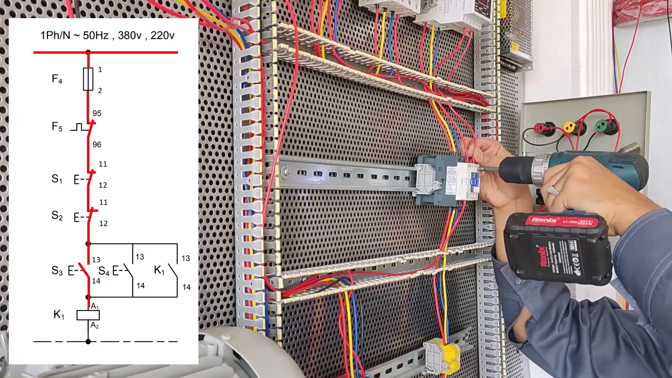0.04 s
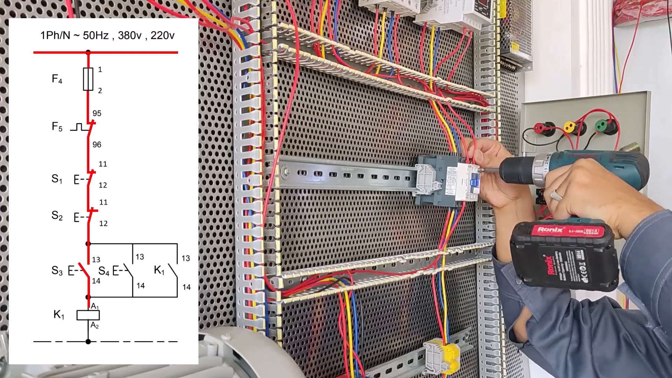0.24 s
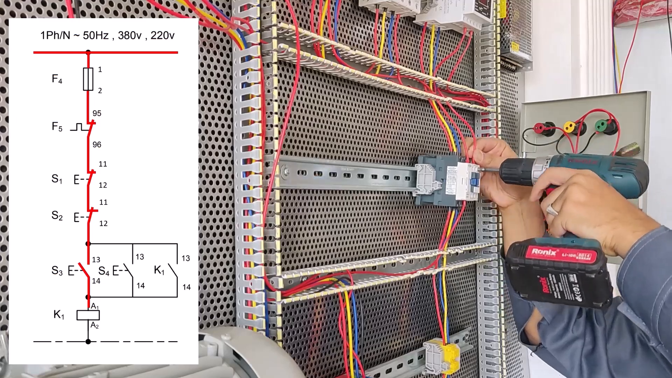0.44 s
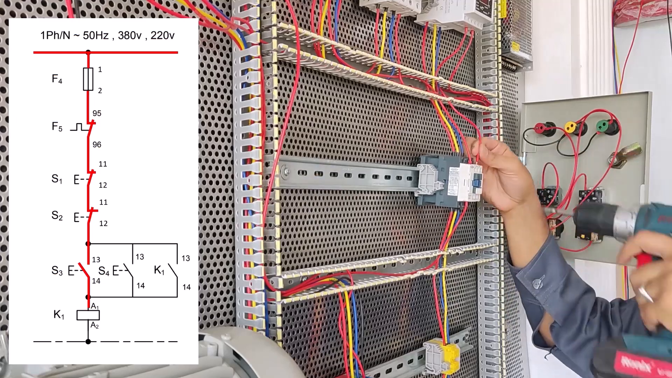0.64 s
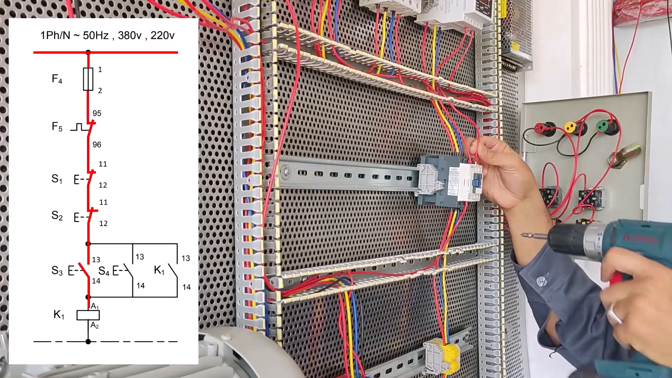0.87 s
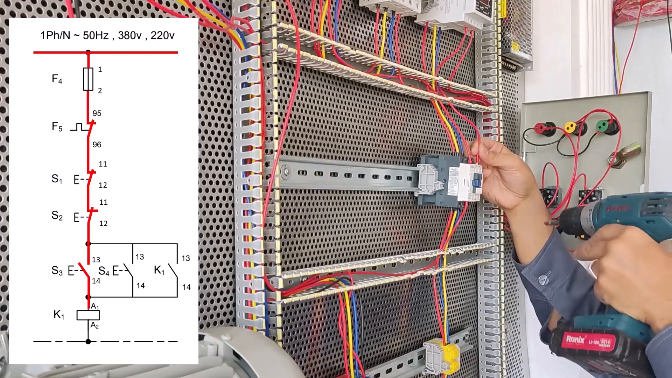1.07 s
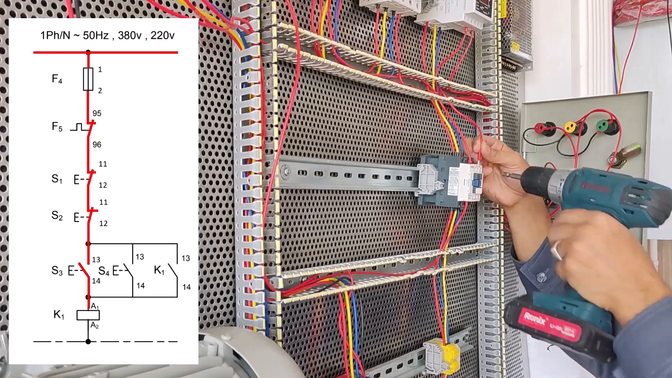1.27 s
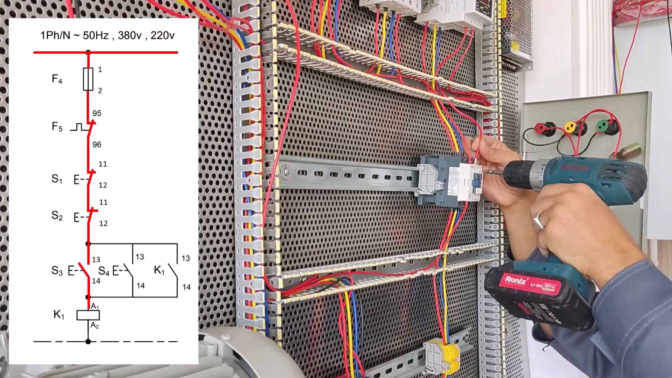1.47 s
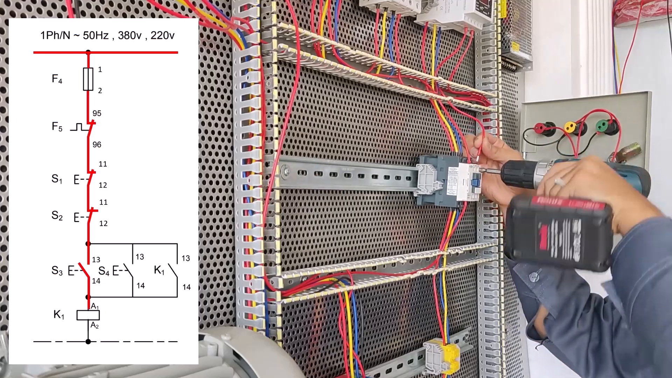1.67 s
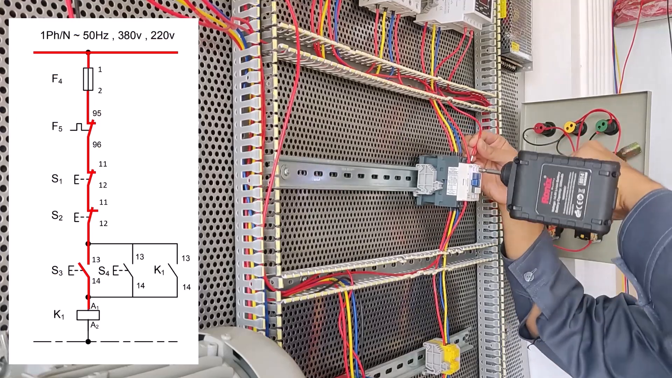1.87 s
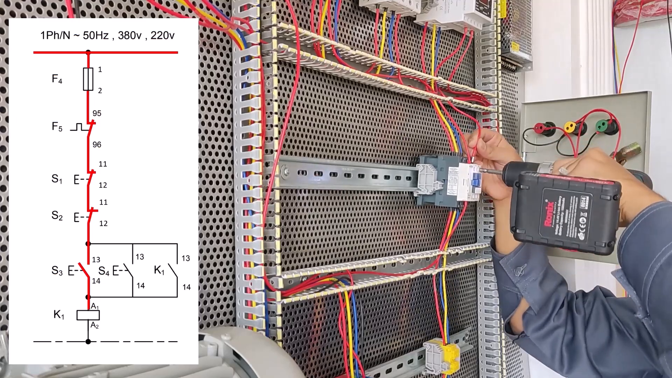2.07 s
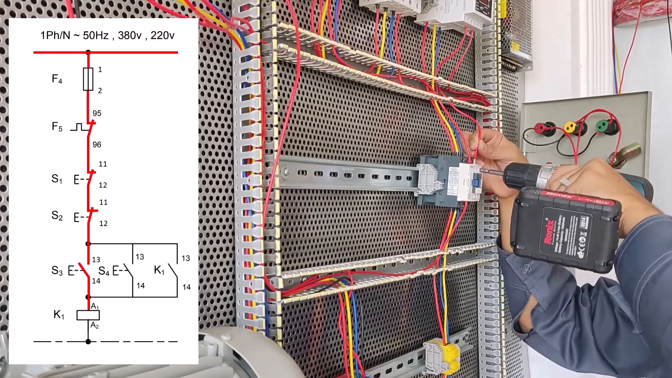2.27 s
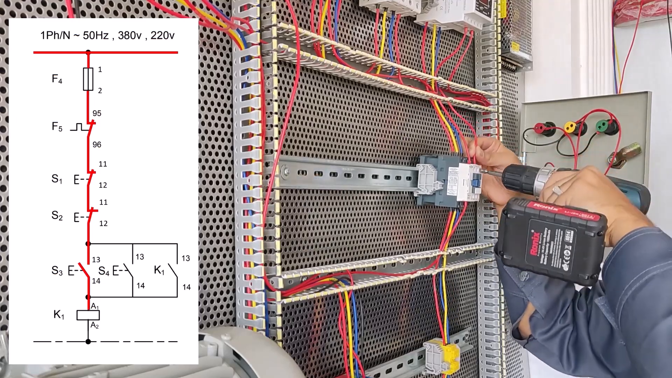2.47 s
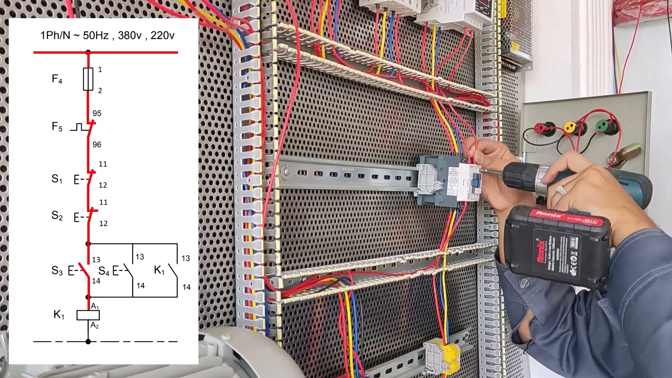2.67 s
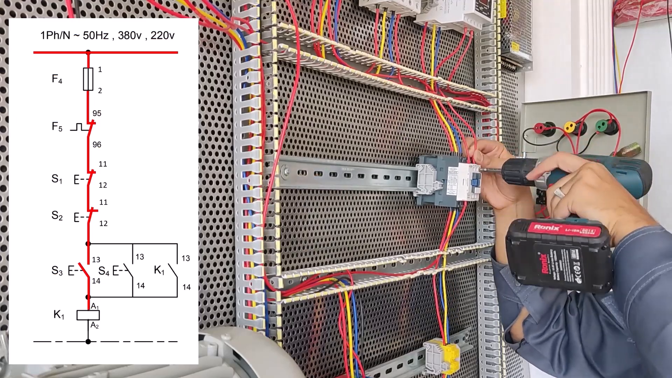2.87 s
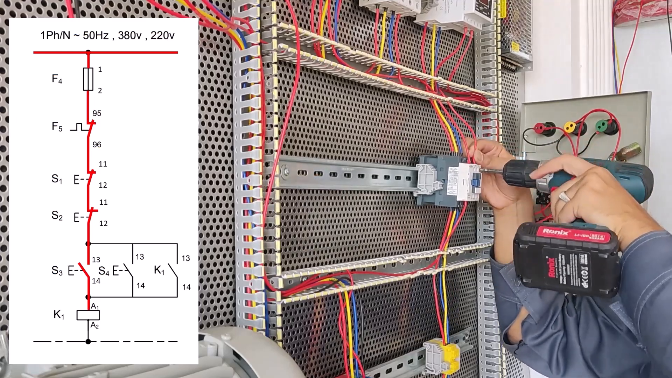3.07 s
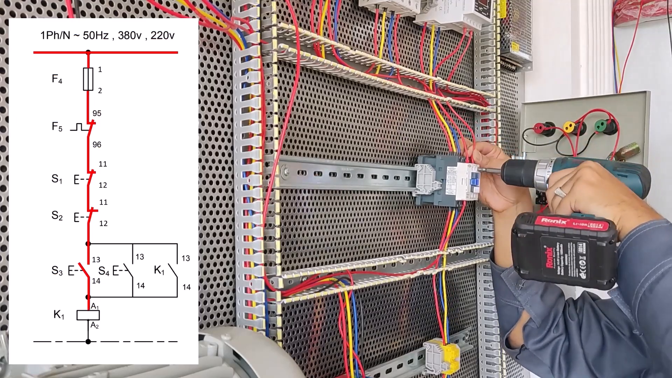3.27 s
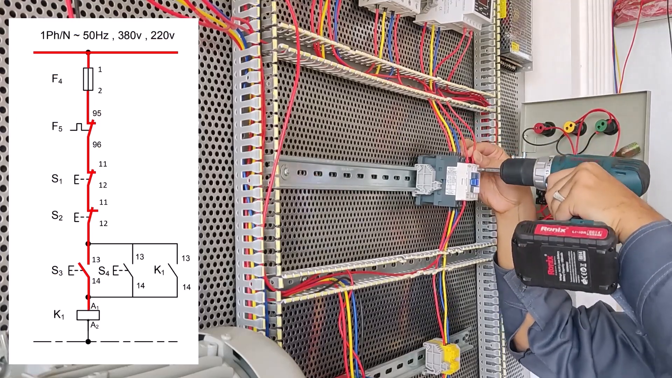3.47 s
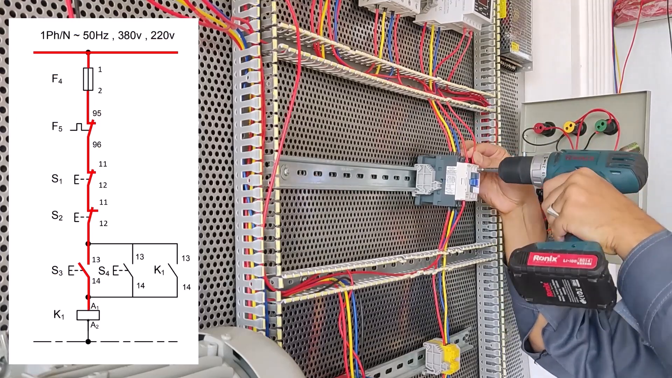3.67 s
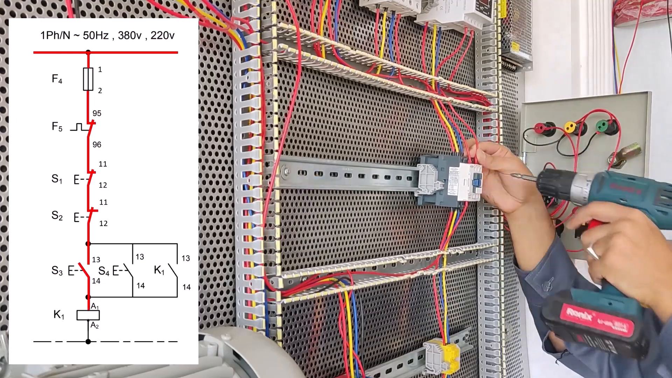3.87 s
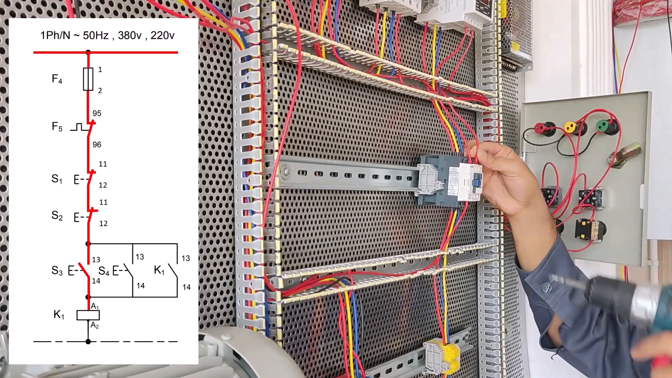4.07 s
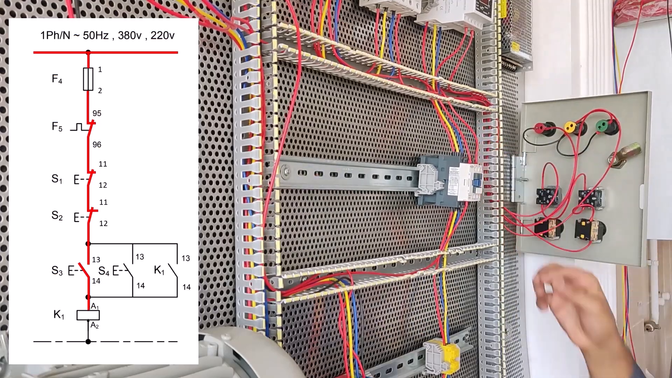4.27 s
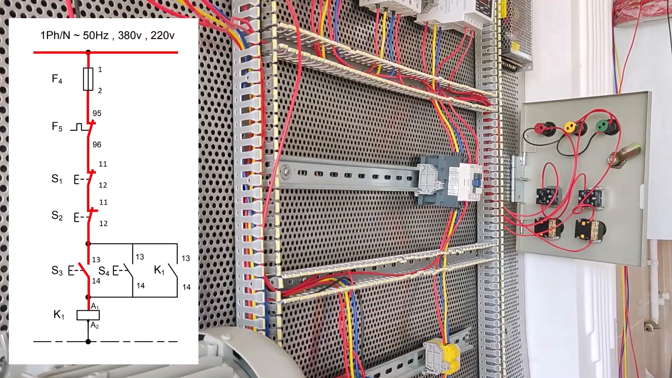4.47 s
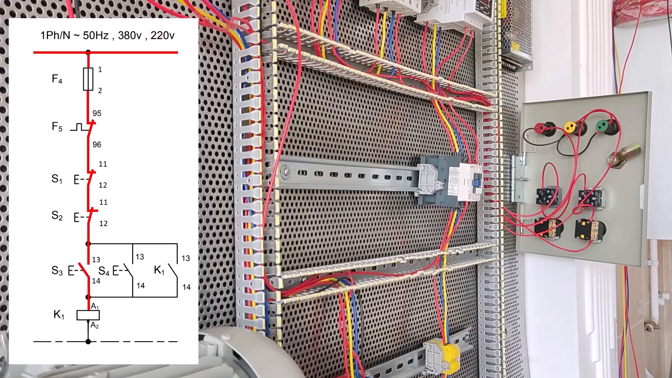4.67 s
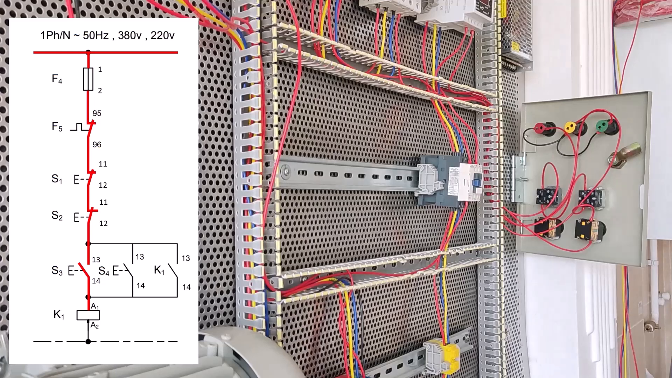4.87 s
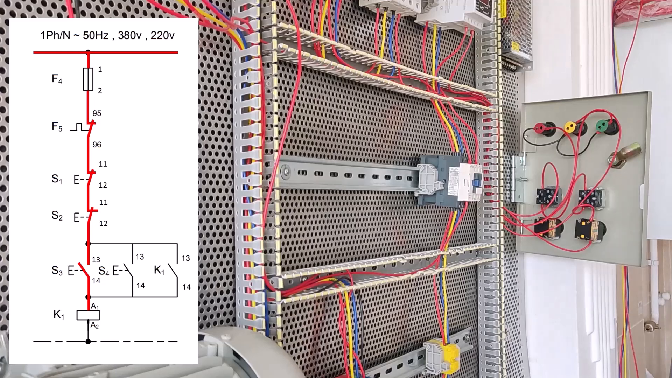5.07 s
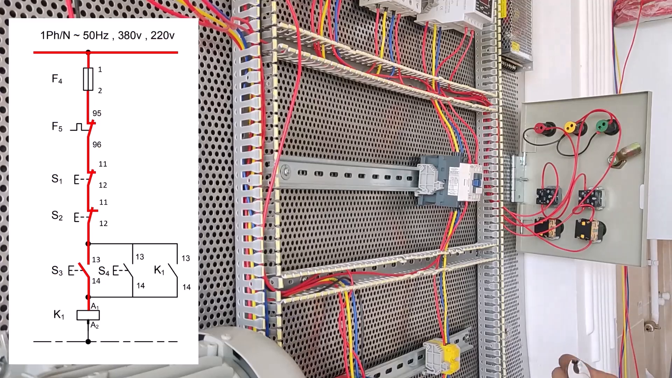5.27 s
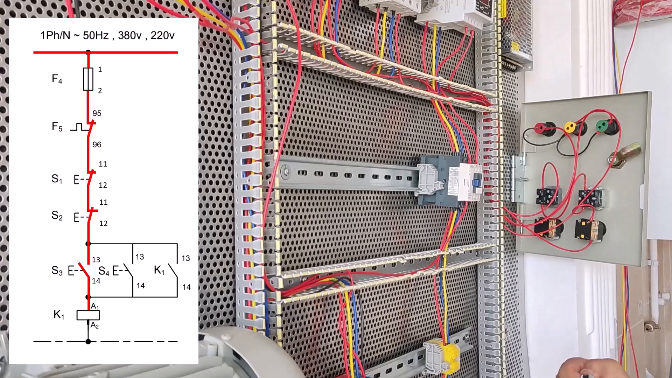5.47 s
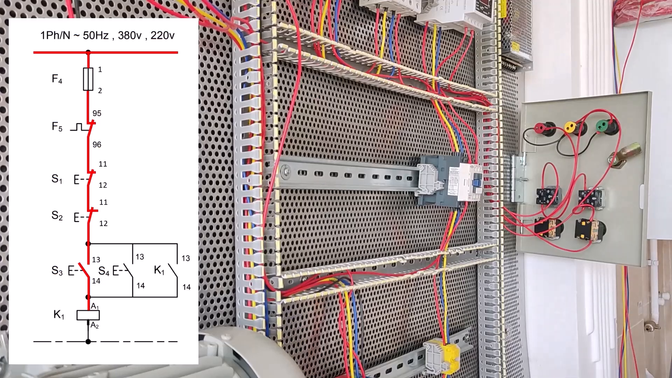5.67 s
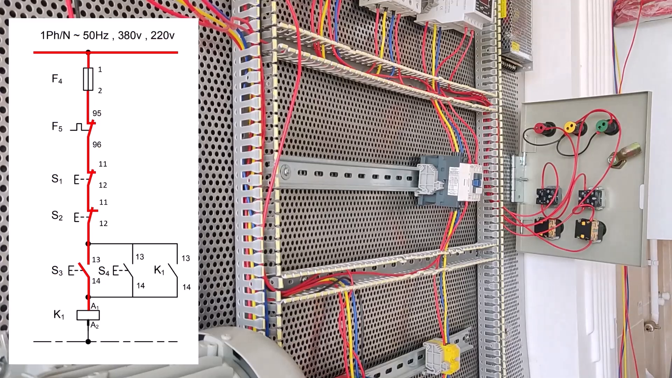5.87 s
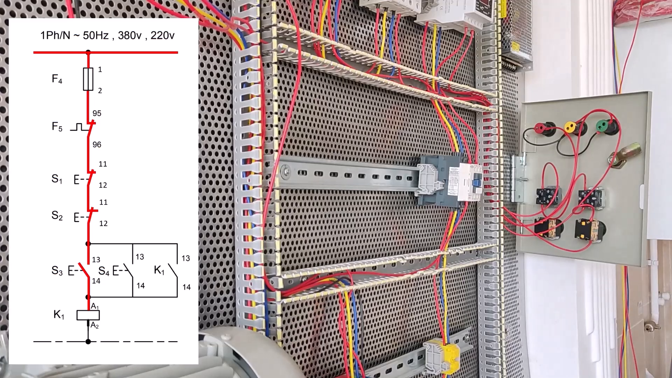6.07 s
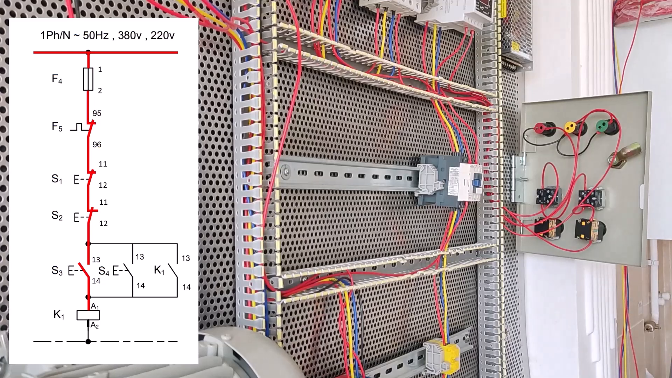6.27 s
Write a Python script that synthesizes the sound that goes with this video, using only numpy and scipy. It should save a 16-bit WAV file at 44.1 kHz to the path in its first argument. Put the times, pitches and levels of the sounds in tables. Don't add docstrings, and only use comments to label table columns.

```python
import sys
import numpy as np
from scipy import signal
from scipy.fft import rfft, irfft
from scipy.io import wavfile
from scipy.ndimage import uniform_filter1d, minimum_filter1d

SR = 44100
rng = np.random.default_rng(int(sys.argv[2]) if len(sys.argv) > 2 else 0)


def nominal_scale(level):
    x = np.asarray(level, float) / 20
    return 10 ** x


def generate_wav(sig):
    pcm = np.round(np.clip(np.atleast_2d(sig).T, -1, 1) * 32767).astype(np.int16)
    wavfile.write(sys.argv[1], SR, pcm)


N = 279140
T, HZ = np.arange(N) / SR, np.fft.rfftfreq(N, 1 / SR)

# [t/s, level/dB]
STIR = [(0, 9), (.55, 4), (.7, 5), (2.2, -1.5), (2.9, 1), (3.5, 3.5), (4.1, 2), (4.35, -23), (4.5, -31.5),
        (4.6, -1), (5.1, 9.5), (5.5, 3.5), (6.33, 13)]
# [t/s, rumble/dB, murmur re rumble/dB, width/s]
SHAKE = [(0, -50, -5, 0.02), (0.352, -37.5, -5, 0.014), (0.519, -43, -6, 0.034), (2.03, -49.5, -24, 0.057),
         (2.2, -53.5, -15, 0.047), (3.109, -42, -27, 0.11), (3.42, -47.5, -33, 0.027),
         (3.63, -50.5, -12.5, .04), (3.74, -38.5, -7.5, 0.06), (4.56, -56.5, -13.5, 0.025),
         (5.34, -57.5, -19.5, 0.036), (5.915, -39, -27, 0.019), (6.15, -61, -10, 0.014)]
# [f/Hz, density/dB]
AIR = [(35, -31), (60, -0.5), (107, -11), (155, -6.5), (199, -18.5), (257, -12.5), (438, -26), (727, -32),
       (5680, -51.5), (13700, -45), (15000, -58.5)]
# [t/s, level/dB, t60/s]
AFTERGLOW = [(.945, -81, 0.25), (1.06, -79.5, 0.18), (1.25, -84, 0.28), (2.36, -81, 0.28), (2.8, -82, 0.28),
             (3.949, -85, 0.28), (4.09, -87, 0.16), (4.86, -87.5, 0.56)]
# [t/s, f/Hz, level/dB]
HUM = [(4.549, 145, -76), (4.9, 150, -71), (5.0, 124.6, -59.5), (5.07, 119.5, -64), (5.361, 141.8, -59),
       (5.43, 120.2, -69), (5.822, 125.3, -54.5), (5.991, 140.4, -68.5), (6.33, 137.2, -58)]
# [t/s, level/dB]
BOOM = [
    (4.574, -51.5),
    (4.763, -36.5),
    (5.909, -33),
]
# [t/s, level/dB]
CHIRP = [(0.949, -77.5), (1.401, -75), (4.149, -83.5), (5.371, -77.5), (5.534, -67.5), (6.09, -75)]
RUMBLE_DB, RUMBLE_SHARE, MURMUR_DB, AIR_DB = -58, 0.27, -73.5, -82
BOOM_HZ, BOOM_RISE_S, BOOM_T60_S = 150, 0.0062, 0.13

# [t/s, f/Hz, level/dB, t60/s]
LINGER = [(1.187, 4150, -56, 0.22), (1.2, 2500, -70, 0.27), (2.77, 2820, -62, .25), (3.86, 1440, -51, 0.32),
          (3.9, 2060, -71.5, 0.31), (.65, 3740, -75.5, 0.33), (.65, 1400, -70, 0.32),
          (0.36, 2260, -80.5, 0.19), (3.65, 400, -40, 0.25), (.47, 560, -46, 0.26), (5.89, 390, -37, 0.13),
          (5.79, 600, -71.5, .08), (3.2, 1800, -59, .1), (.45, 1800, -43.5, .3), (2.755, 2300, -62, 0.18),
          (1.703, 1520, -55.5, .2), (2.33, 2150, -57.5, 0.22), (1.06, 3300, -64.5, 0.13),
          (1.85, 2700, -51.5, .05)]

# [f/Hz, density/dB]
CLOTH = [(88, -41), (150, -5.5), (567, 7.5), (742, -26), (1510, -4.5), (2140, -13.5), (2860, -7.5),
         (4460, -12.5), (6060, -25), (8250, -10), (11500, -10), (14200, -22.5), (15000, -54.5)]
# [t/s, middle/dB, ring re middle/dB, treble re middle/dB, ring f/Hz]
RUSTLE = [(0.639, -75.5, 17, 20, 1530), (0.664, -59.5, 7.5, -7, 1510), (0.6974, -70, -3, 4.5, 1520),
          (2.69, -65, 0, -19, 2805), (3.126, -53, 16, -32, 3300), (3.1944, -41.5, -14, -8.5, 1820),
          (6.0194, -75.5, 6.5, -23.5, 2620)]
# [t/s, middle/dB, ring re middle/dB, treble re middle/dB, ring f/Hz]
SWEEP = [(2.991, -62, -8, -7.5, 2080), (4.76, -37.5, -4, 0.5, 2690), (4.79, -45, -6, 2, 2230),
         (4.8085, -38, -21, 3.5, 3470), (4.737, -51, -12, 1, 2520), (4.86, -70.5, -13, 7, 3000),
         (1.135, -54, 3.5, -4, 3500), (2.73, -50, 0, -5, 3020), (3.02, -55.5, -2, -11, 3000),
         (3.225, -45.5, 8, 5, 3300), (4.9401, -62, -16.5, -21, 3200), (5.699, -61, 21.5, 12, 2410),
         (5.7169, -77, 19.5, -9, 2230), (6.199, -29.5, -12, -13, 2840), (6.233, -51, -1.5, -37, 2720),
         (6.298, -56, -9, -27, 3800)]
# [t/s, brush/dB, ring re brush/dB, ring f/Hz]
WISP = [(.635, -85.5, 24, 7050), (.64, -96, 17, 3030), (.645, -95, 22, 10500), (.655, -94, 19, 3800),
        (.68, -95, 18, 3030), (.69, -94, 18, 3800), (.7, -95, 21, 7800), (.7, -95, 21, 9100),
        (4.395, -88, 27.5, 13500), (4.395, -93, 30.5, 11270), (5.02, -82, 29.5, 1700),
        (5.695, -67.5, 16.5, 3800), (5.695, -73.5, 26, 6840), (5.76, -87, 21, 13760), (6.0, -94, 22, 13440)]
# [f/Hz, density/dB]
BENCH = [(40, -15), (60, 0.5), (160, -5), (250, 2.5), (470, 4.5), (700, 0.5), (1200, -14), (2300, -21.5),
         (4000, -37), (6000, -50), (15000, -65)]
# [f/Hz, level/dB, t60/s]
BENCH_MODES = [(207, 9, 0.035), (258, 1, 0.047), (330, -24, 0.061), (462, -3.5, 0.093), (600, 5.5, 0.049),
               (670, 0.5, 0.054), (934, -9, 0.033), (1520, -4.5, 0.038), (1950, -11, 0.029)]
# [t/s, bass/dB, middle re bass/dB, treble re bass/dB, boom f/Hz]
THUD = [(3.052, -47.5, -13, 19.5, 340), (4.526, -33, -6, -30, 404), (4.554, -50, -18, -28, 348),
        (4.752, -33.5, 1.5, -2, 148), (4.796, -41.5, 11, -9, 808), (4.985, -48, -30, -40, 151),
        (5.016, -38.5, -30, -51, 470.5), (5.744, -48, -39.5, -31, 148.8), (5.785, -48, -38, -40, 249),
        (5.845, -25, -0.5, -49, 498), (5.860, -25, -8, -46, 400), (5.877, -15.5, -6, -37, 600),
        (5.891, -23, -20, -47, 468), (5.905, -18.5, -10.5, -38.5, 262), (5.929, -31, -11, -55, 625),
        (6.146, -59, -37.5, -42, 166), (6.204, -48, 13.5, 7.5, 960)]
# [t/s, level/dB]
KNOCK = [(4.533, -58), (4.540, -52), (4.757, -54.5), (4.769, -50.5), (5.849, -41), (5.860, -43.5),
         (5.880, -32), (5.886, -32.5), (5.900, -32), (5.912, -30.5), (5.934, -42)]
# [t/s, level/dB]
GRIT = [(5.843, -59.5), (5.85, -55), (5.880, -52), (5.886, -51.5), (5.890, -49), (5.894, -47.5),
        (5.903, -56), (5.911, -51), (5.920, -50), (4.4222, -56)]
RUSTLE_T60_S, SWEEP_T60_S, WISP_T60_S, THUD_T60_S = 0.13, 0.07, 0.07, 0.061
WISP_TREBLE_DB = 14

# [f/Hz, t60/s]
ROOM_T60 = [(300, 0.25), (3000, 0.17), (6000, 0.065), (14000, 0.1)]
ROOM_DB = -15
GATE_WAIT_S, GATE_CLOSE_S, GATE_MIDDLE_SHARE = 0.084, 0.055, 0.16

# [f/Hz, density/dB]
STEEL = [(59, -47.5), (100, -10.5), (867, -6.5), (1430, -7.5), (3920, -9), (4640, -2), (6090, -14),
         (8880, -1), (13500, -13), (15000, -31)]
# [f/Hz, width/Hz, level/dB]
STEEL_RING = [(1510, 180, 3), (1226, 47, 0.5), (2980, 260, 2.5), (4630, 310, 3.5), (8570, 250, 7),
              (8870, 120, 10.5), (11250, 660, 14)]
# [f/Hz, level/dB, t60/s]
RAIL_MODES = [(627, -5.5, 0.087), (1228, -4, 0.053), (1437, -4, .09), (1545, -4, 0.068), (2940, -3.5, .06),
              (3630, -7, 0.11), (4520, -2, 0.072), (4704, -3.5, 0.068), (4880, -5, .07), (7060, -10, .04),
              (9040, -4, 0.052), (8570, -2.5, .06), (11397, -6, .04)]
# [t/s, middle/dB, bass re middle/dB, treble re middle/dB]
CLUTCH = [(0.2255, -19.5, -4.5, -12), (0.2495, -14, -9, -7), (0.2725, -15.5, -11, 0),
          (0.296, -16.5, -6, -7), (0.3206, -17, -11, -1), (0.342, -16, -5, -7), (0.3655, -16, -7, -1),
          (0.3914, -14, -9.5, -6), (0.414, -20.5, -7, -1), (3.5959, -15.5, -9.5, -2),
          (3.6232, -19, -5, -4.5), (3.65, -17.5, -2, -5.5), (3.6782, -17, -8, -3), (3.7047, -19, 0.5, -4),
          (3.7287, -18, -2.5, -0.5), (3.759, -18, -4.5, -1)]
# [t/s, middle/dB, bass re middle/dB, rise/s, t60/s]
TOUCH = [(1.702, -49.5, -13, 0.014, 0.28), (1.721, -32.5, -11, 0.0025, 0.11),
         (1.865, -18, -23.5, 0.026, 0.27), (2.272, -24, -14.5, 0.0039, 0.11),
         (3.249, -32, -30, 0.0076, 0.098), (0.437, -15, -3.5, 0.0013, 0.23), (3.7828, -19, 0, 0.0015, 0.25)]
# [t/s, level/dB, t60/s]
PING = [
    (0.446, -40, 0.23),
    (3.253, -35, .2),
    (3.79, -46, 0.15),
    (4.537, -62.5, 0.1),
]
# [f/Hz, level/dB, share of t60]
PING_HZ = [(4550, -0.5, 0.88), (8800, -13, .35), (4760, -4.5, .9)]
# [t/s, level/dB]
CRACK = [(0.44, -19.5), (1.0022, -41.5), (1.0105, -45), (1.724, -50.5), (3.2537, -25.5), (3.058, -26.5),
         (4.7715, -33.5), (4.7594, -43), (4.781, -49), (4.803, -44), (4.8187, -38), (0.252, -23),
         (0.275, -22.5), (0.3225, -23), (0.3915, -23.5), (3.651, -23.5), (3.68, -25), (1.1554, -18),
         (1.157, -18), (2.7466, -40), (3.0432, -24), (3.0495, -28.5), (3.597, -18), (3.758, -14),
         (4.7677, -28.5)]
# [f/Hz, density/dB]
PLASTIC = [(88, -53), (150, -11.5), (468, 19), (991, -39), (1160, -10), (2400, -6.5), (3600, 3.5),
           (5300, -14.5), (6180, -20), (7790, 2), (11500, 0), (13900, -9.5), (15000, -8)]
# [f/Hz, width/Hz, level/dB]
PLASTIC_RING = [(2920, 290, 3.5), (4152, 100, -10), (7170, 250, 5.5), (8475, 200, 5), (9540, 350, 2)]
# [t/s, middle/dB, body ring re middle/dB, treble re middle/dB, t60/s]
CLICK = [(1.002, -46, 7.5, 5, 0.17), (1.0114, -68, -14, -12, 0.05), (1.1554, -18.5, 3, -7, 0.02),
         (1.17, -38, -6, -9, 0.16), (3.043, -26, 3.5, -21.5, 0.05), (3.048, -26, -8.5, -2.5, 0.16),
         (3.068, -25, -11, -25, 0.16)]
# [t/s, middle/dB, ring re middle/dB, treble re middle/dB, t60/s]
LEVER = [(0.8561, -63.5, -4.5, -26, 0.22), (1.1644, -35, 1.5, 2, 0.13), (2.7458, -30, -14, -13, 0.027),
         (2.748, -45, 11, -21, 0.2)]
# [t/s, middle/dB, ring re middle/dB, ring f/Hz, t60/s]
LATCH = [(1.158, -49, 15.5, 1200, 0.018), (1.154, -48, 17.5, 4000, 0.2), (3.051, -46.5, 16, 1830, 0.25)]
# [f/Hz, level/dB, t60/s]
SWITCH_MODES = [(1120, -25, .06), (1596, -4, 0.041), (9300, -10.5, 0.059), (9710, -12.5, 0.047),
                (2600, 0, 0.076), (2860, -1, 0.08), (3520, -4.5, 0.07), (4050, -0.5, 0.0612),
                (4300, -7.5, .06), (5340, -4.5, 0.049), (7235, -4, 0.0503), (7730, -10, 0.075),
                (8830, -11, 0.073)]
CLUTCH_RING_DB, CLUTCH_RISE_S, CLUTCH_T60_S, TOUCH_TREBLE_DB = -14, 0.003, 0.12, -6
CLICK_HZ, LEVER_HZ, LATCH_TREBLE_DB = 3855, 2960, -14
SNAP_S, SNAP_DB = 1.160, -33.5

# [on t/s, off t/s, rattle/dB, housing re rattle/dB, share of the fade the housing keeps]
PULLS = [
    (-.06, 0.433, -39, 4.5, 0.66),
    (1.881, 2.263, -37.5, 2, 0.35),
    (3.263, 3.776, -39, 5, 0.69),
]
REVERSE = [0, 1, 0]
# [from t/s, to t/s, shaft f/Hz]
SINGING = [
    (.05, .23, 308.7),
    (1.95, 2.27, 299.7),
    (3.32, 3.6, 309.0),
]
# [multiple of shaft turn, forward/dB, reverse/dB]
WHINE = [(1.038, -25, -42.5), (2.063, -24, -42.5), (3.023, -13, -12.5), (9.05, -10, -9),
         (10.09, -10.5, -24.5), (12.23, -15, -6.5), (15.2, -22, -15.5), (18.0, -34.5, -17.5),
         (23.1, -9.5, -19), (29.2, -16, -35)]
# [f/Hz, density/dB]
GEARS = [
    [(180, -38.5), (300, -12.5), (371, -21.5), (606, 1.5), (855, -12.5), (913, -7), (991, -2), (1620, 3),
     (2320, 0.5), (3670, 0.5), (4700, -8.5), (5900, -11.5), (8740, 0.5), (13600, -10.5), (14300, -12.5),
     (15000, -41)],
    [(180, -49), (300, -20), (416, -30), (616, -4), (814, -17), (898, -25), (975, -9.5), (1490, -2.5),
     (3270, -6.5), (3670, -1.5), (4930, -19), (7670, -2), (13600, -9), (14300, -49.5), (15000, -43)],
]
# [t/s, f/Hz, level/dB, t60/s]
CLUNK = [
    (1.863, 487, -42, 0.1),
    (2.27, 718, -34.5, 0.11),
    (2.279, 2230, -42, 0.19),
    (3.257, 645, -39.5, 0.22),
]
LEAD_S, LEAD_DB, SPIN_UP_S, SPIN_UP_DB = 0.049, -48.5, 0.049, -4
LOAD_DB, LOAD_HOUSING_DB = 3.5, 2
COAST_S, COAST_DB, COAST_BEND, SHUT_S = 0.1, -43, 1.3, 0.185
DIP_S, DIP_DB, DIP_WIDTH_S = 0.12, -8, 0.008
LULL_S, LULL_DB, LULL_WIDTH_S = 0.42, -5, 0.014


def unit(x):
    return x / np.sqrt(np.mean(x ** 2) + 1e-30)


def noise():
    return rng.standard_normal(N)


def band(x, lo_hz, hi_hz, order=4):
    return signal.sosfilt(signal.butter(order, [lo_hz, hi_hz], "bandpass", fs=SR, output="sos"), x)


def colour(x, points, rings=()):
    hz, db = np.transpose(points)
    gain = nominal_scale(np.interp(np.log(HZ + 1), np.log(hz), db))
    for centre_hz, width_hz, peak_db in rings:
        gain = gain * (1 + nominal_scale(peak_db) / (1 + (2 * (HZ - centre_hz) / width_hz) ** 2))
    return irfft(rfft(x) * gain, N)


def walk(rate_hz):
    k = int(SR / rate_hz)
    held = np.repeat(rng.standard_normal(N // k + 1), k)
    return 1.1 * uniform_filter1d(uniform_filter1d(held, k), k)[:N]


def grit(spread_db):
    return unit(noise() * nominal_scale(spread_db * walk(900)))


def around(s):
    return slice(max(int((s - 0.1) * SR), 0), int((s + 0.4) * SR))


def swell(s, rise_s, t60_s, order=1):
    out = np.zeros(N)
    t = T[around(s)] - s - 1.1 * rise_s
    rise = -2 * (t / max(rise_s, 1e-4)) ** 2
    fall = -np.log(1000) * (np.abs(t) / max(t60_s, 0.005)) ** order
    lead_in = nominal_scale(-36) * np.exp(-np.abs(t) / 0.0071)
    out[around(s)] = np.exp(np.where(t < 0, rise, fall)) + lead_in
    return out


def bands(sound):
    return [unit(band(sound, lo, hi)) for lo, hi in [(60, 1000), (1000, 6000), (6000, 16000)]]


def ring(row, shake, width):
    out, hz = np.zeros(N), row[4]
    out[around(row[0])] = unit(band(shake[around(row[0])], hz * (1 - width), hz * (1 + width), order=2))
    return out


def hit(row, rise_s, t60_s, lead, second, high, treble_decay, order=1):
    body = swell(row[0], rise_s, t60_s, order)
    sparkle = swell(row[0], rise_s, t60_s * treble_decay, order)
    return nominal_scale(row[1] - 14.5) * (body * (lead + nominal_scale(row[2]) * second) + nominal_scale(row[3]) * sparkle * high)


def hits(rows, sound, rise_s, width, treble_decay, order):
    _, mid, high = bands(sound)
    shake, out = noise(), 0
    for row in rows:
        out = out + hit(row, rise_s, row[5], mid, ring(row, shake, width), high, treble_decay, order)
    return out


def strikes(rows, modes):
    out = np.zeros(N)
    for (s, db), chance in zip(rows, rng.standard_normal((len(rows), 3, len(modes)))):
        t = np.maximum(T[around(s)] - s, 0)
        for (hz, mode_db, t60_s), off, mix, turn in zip(modes, *chance):
            level = nominal_scale(db + mode_db + 4.0 * mix - 60 * t / t60_s) * np.minimum(t / 0.001, 1)
            out[around(s)] += level * np.sin(2 * np.pi * hz * (1 + 0.012 * off) * t + 3 * turn)
    return out


def background():
    stir_db = np.interp(T, *np.transpose(STIR))
    rumble, murmur = nominal_scale(RUMBLE_DB + RUMBLE_SHARE * stir_db), nominal_scale(MURMUR_DB + stir_db)
    for s, db, murmur_db, width_s in SHAKE:
        bump = np.exp(-((T - s) / width_s) ** 2)
        rumble = rumble + nominal_scale(db) * bump
        murmur = murmur + nominal_scale(db + murmur_db) * bump
    air = colour(noise(), AIR)
    out = rumble * unit(band(noise(), 11, 48, order=3))
    out += murmur * nominal_scale(0.54 * walk(13)) * unit(band(air, 73, 400, order=2))
    out += nominal_scale(AIR_DB + 9.0 + 2.0 * walk(9.3)) * unit(band(air, 270, 3500, order=1))
    after = sum(nominal_scale(db) * swell(s, 0.014, t60_s, order=1.6) for s, db, t60_s in AFTERGLOW)
    out += after * nominal_scale(2.9 * walk(34)) * unit(band(noise(), 500, 3700, order=3))
    s, hz, db = np.transpose(HUM)
    phase = 2 * np.pi * np.cumsum(np.interp(T, s, hz) * (1 + 0.031 * walk(20))) / SR
    hum = np.sin(phase) + 0.086 * np.sin(2 * phase)
    out += nominal_scale(np.interp(T, s, db, left=-120) + 3.5 + 3.0 * walk(30)) * hum
    boom = sum(nominal_scale(db) * swell(s, BOOM_RISE_S, BOOM_T60_S) for s, db in BOOM)
    out += boom * np.sin(2 * np.pi * BOOM_HZ * T)
    pipe = unit(band(noise(), 704, 750, order=2))
    return out + sum(nominal_scale(db) * swell(s, 0.0073, 0.24) for s, db in CHIRP) * pipe


def lingering():
    shake, out = noise(), 0
    for s, hz, db, t60_s in LINGER:
        out = out + nominal_scale(db) * swell(s, 0.0067, t60_s) * ring((s, 0, 0, 0, hz), shake, 0.06)
    return out


def room(x):
    t = T[:SR // 2]
    hz_known, t60_known_s = np.transpose(ROOM_T60)
    tail = 0
    for hz in 100 * 2 ** np.arange(7.5):
        t60_s = np.interp(np.log(hz), np.log(hz_known), t60_known_s)
        octave = band(rng.standard_normal(len(t)), hz / 2 ** 0.5, hz * 2 ** 0.5, order=2)
        tail = tail + octave * 10 ** (-3 * t / t60_s)
    tail *= np.clip((t - 0.003) / 0.0024, 0, 1)
    return x + nominal_scale(ROOM_DB) * signal.fftconvolve(x, tail / np.sqrt(np.sum(tail ** 2)))[:N]


def gate(x):
    db = 0
    for _, off, *_ in PULLS:
        closing = np.maximum(T - off - GATE_WAIT_S, 0) / GATE_CLOSE_S
        db = db - 10 * closing ** 2 * (T < off + 0.38)
    high = signal.sosfiltfilt(signal.butter(4, 5400, "highpass", fs=SR, output="sos"), x)
    return high * nominal_scale(db) + (x - high) * nominal_scale(GATE_MIDDLE_SHARE * db)


def suppress(x, edge_db):
    z = signal.stft(x, nperseg=512, noverlap=384)[2]
    power = uniform_filter1d(uniform_filter1d(np.abs(z) ** 2, size=5, axis=0), size=5, axis=1)
    gain = 1 / (1 + (nominal_scale(edge_db) ** 2 / (power + 1e-20)) ** 2)
    return signal.istft(z * gain, nperseg=512, noverlap=384)[1][:N]


def thuds():
    low, mid, _ = bands(colour(grit(spread_db=3.0), BENCH))
    crackle = unit(band(grit(spread_db=8.0), 2500, 20000, order=2))
    shake = noise()
    crumbs = sum(nominal_scale(db - 8.5) * swell(s, 0.0006, 0.012) for s, db in GRIT)
    out = crumbs * unit(band(shake, 2000, 15000, order=2))
    for row in THUD:
        boom = band(ring(row, shake, 0.17), 60, 1300, order=2)
        out += hit(row, 0.01, THUD_T60_S, low + 1.363 * boom, mid, crackle, 0.59, order=2)
    return out + band(strikes(KNOCK, BENCH_MODES), 60, 3000, order=3)


def hands():
    cloth = colour(grit(spread_db=3.5), CLOTH)
    brush = [(*r, RUSTLE_T60_S) for r in RUSTLE] + [(*r, SWEEP_T60_S) for r in SWEEP]
    wires = [(*r[:3], WISP_TREBLE_DB, r[3], WISP_T60_S) for r in WISP]
    out = hits(brush, cloth, 0.012, 0.12, treble_decay=0.57, order=2)
    return out + hits(wires, cloth, 0.013, 0.054, treble_decay=1.0, order=2) + thuds()


def cracks():
    edge = unit(band(noise(), 1300, 18000, order=2))
    return sum(nominal_scale(db - 12.5) * swell(s, 0.0012, 0.032) for s, db in CRACK) * edge


def snaps():
    out = 0
    for hz, db, share in PING_HZ:
        song = unit(band(noise(), hz * 0.98, hz * 1.02, order=2))
        out = out + song * sum(nominal_scale(db + knock_db) * swell(s, 0.003, t60_s * share) for s, knock_db, t60_s in PING)
    for hz, db, t60_s in SWITCH_MODES:
        out += nominal_scale(SNAP_DB + db) * swell(SNAP_S, 0.0017, t60_s) * np.sin(2 * np.pi * (hz * T + rng.random()))
    return out


def lull():
    return LULL_DB * np.exp(-((T - LULL_S) / LULL_WIDTH_S) ** 4)


def tool():
    low, mid, high = bands(colour(grit(spread_db=0.0), STEEL, STEEL_RING))
    out = sum(hit(row, CLUTCH_RISE_S, CLUTCH_T60_S, mid, low, high, 0.88, order=1.2) for row in CLUTCH)
    out = out * nominal_scale(lull())
    out += strikes([(s, db + CLUTCH_RING_DB) for s, db, *_ in CLUTCH], RAIL_MODES)
    for s, db, bass_db, rise_s, t60_s in TOUCH:
        out += hit((s, db, bass_db, TOUCH_TREBLE_DB), rise_s, t60_s, mid, low, high, 0.36, order=1.4)
    plastic = colour(grit(spread_db=2.5), PLASTIC, PLASTIC_RING)
    clicks = [(*r[:4], CLICK_HZ, r[4]) for r in CLICK]
    levers = [(*r[:4], LEVER_HZ, r[4]) for r in LEVER]
    latches = [(*r[:3], LATCH_TREBLE_DB, *r[3:]) for r in LATCH]
    out += hits(levers + latches, plastic, 0.0011, 0.11, treble_decay=0.94, order=1.3)
    out += hits(clicks, plastic, 0.0007, 0.12, treble_decay=0.72, order=1.4)
    return out + cracks() + snaps()


def trigger(on, off, db, housing_db, tail_share, seated):
    s = [on - LEAD_S, on, on + SPIN_UP_S, seated, max(off, seated + 0.002), off + SHUT_S]
    load_db = np.clip((off - seated) / 0.1, 0, 1) * LOAD_DB
    change = np.interp(T, s, [LEAD_DB, SPIN_UP_DB, 0, 0, load_db, load_db])
    change = change + COAST_DB * (np.maximum(T - off, 0) / COAST_S) ** COAST_BEND
    change = change + DIP_DB * np.exp(-((T - DIP_S) / DIP_WIDTH_S) ** 2) + lull()
    fading = np.where(T < off, -0.35, -tail_share)
    housing = housing_db + np.where(change > 0, LOAD_HOUSING_DB / LOAD_DB, fading) * change
    return s, db + change, housing


def drill():
    out, teeth = np.zeros(N), grit(spread_db=1.0)
    for pull, back, (start, stop, shaft_hz) in zip(PULLS, REVERSE, SINGING):
        gears = colour(teeth, GEARS[back])
        high = band(gears, 5200, 16000) / np.std(band(gears, 6600, 8200))
        low = band(gears, 250, 5200) / np.std(band(gears, 1000, 4000))
        s, rattle_db, housing_db = trigger(*pull, seated=stop)
        speed = 1 + 0.0012 * walk(30) - 0.012 * np.exp(-np.maximum(T - start, 0) / 0.03)
        turn = 2 * np.pi * np.cumsum(shaft_hz * speed) / SR
        lines = 0
        for row in WHINE:
            level = nominal_scale(row[1 + back] + 1.9 * walk(25))
            lines = lines + level * np.sin(round(row[0]) * turn + 6 * rng.random())
        steady = np.clip(np.minimum((T - start) / 0.06, (stop - T) / 0.0059), 0, 1)
        on = uniform_filter1d(1.0 * (T >= s[0]) * (T < s[-1]), size=1600)
        rattle = (1 + 0.083 * np.sin(turn)) * (high + nominal_scale(housing_db) * low)
        out += on * nominal_scale(rattle_db - 3) * (rattle + nominal_scale(6.5) * lines * steady)
    for s, hz, db, t60_s in CLUNK:
        jolt = unit(band(noise(), hz * 0.877, hz * 1.09, order=2))
        out += nominal_scale(db) * swell(s, 0.018, t60_s) * jolt
    return out


def scene():
    near = gate(room(drill() + tool())) + hands()
    return (suppress(near, edge_db=-96.5) + background() + lingering())[None]


def band_limit(x):
    return signal.sosfilt(signal.butter(12, 15830, fs=SR, output="sos"), x)


def record(dry):
    x = dry[0] - 0.41 * signal.filtfilt(*signal.iirpeak(6050, 14, fs=SR), dry[0])
    ticks = np.zeros(N)
    ticks[934::1024] = rng.choice([-1, -0.6, 0.6, 1], len(ticks[934::1024]))
    ticks = signal.sosfiltfilt(signal.butter(3, [10800, 13900], "bandpass", fs=SR, output="sos"), ticks)
    sheen = np.sqrt(np.abs(uniform_filter1d(band(x, 11000, 14300) ** 2, size=600)))
    sheen = minimum_filter1d(sheen, size=500)
    x = x + nominal_scale(-1.5) * sheen * unit(ticks)
    top = x + nominal_scale(-8.5) * sheen * unit(band(noise(), 14300, 17000))
    body = signal.sosfiltfilt(signal.ellip(8, 0.1, 50, 14250, fs=SR, output="sos"), top)
    loud = np.clip(uniform_filter1d(x ** 2, size=1500) / nominal_scale(-27.0) ** 2, 0, 1) ** 4
    quick = uniform_filter1d(band(x, 2000, 14000) ** 2, size=200)
    jump = quick / (uniform_filter1d(quick, size=2000) + nominal_scale(-59.5) ** 2)
    opening = np.maximum(loud, np.clip(jump / 5.0, 0, 1) ** 4)
    mix = body + nominal_scale(-11.5) * opening * (top - body)
    return band_limit(mix[None])


dry = scene()
out = record(dry)
generate_wav(out)
```